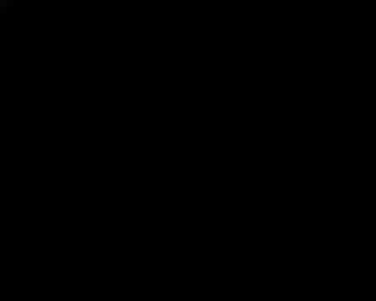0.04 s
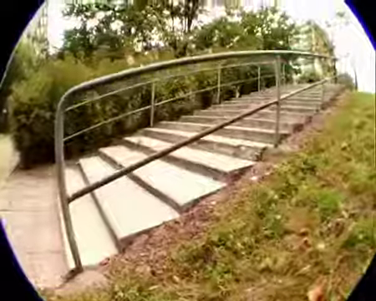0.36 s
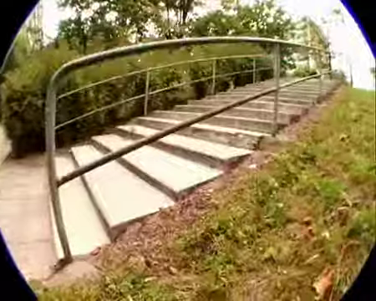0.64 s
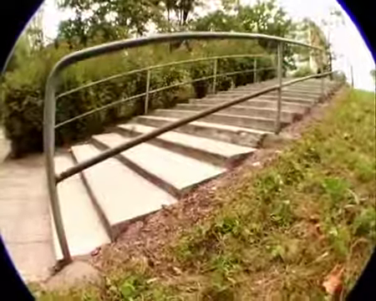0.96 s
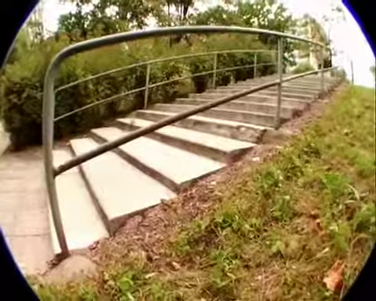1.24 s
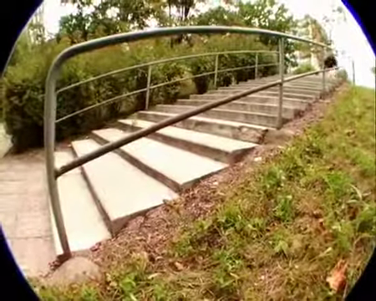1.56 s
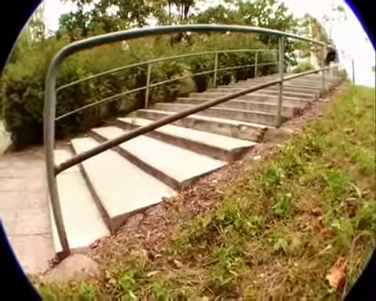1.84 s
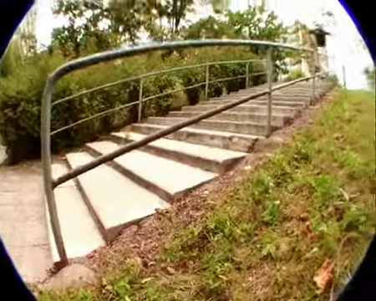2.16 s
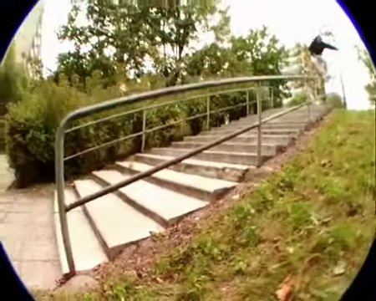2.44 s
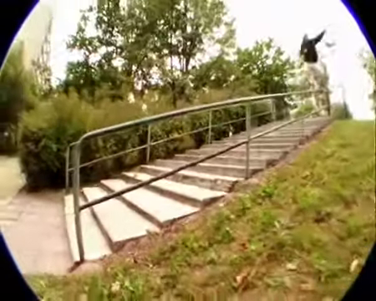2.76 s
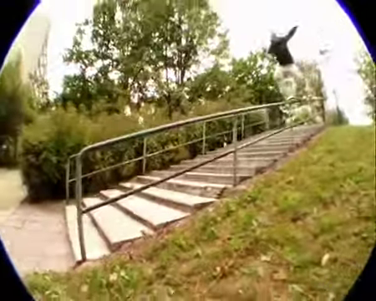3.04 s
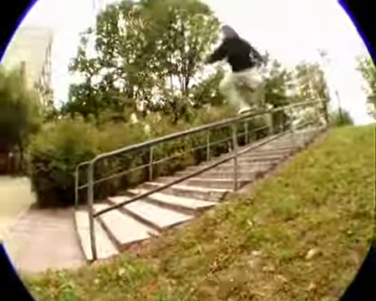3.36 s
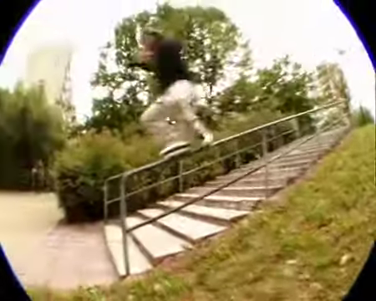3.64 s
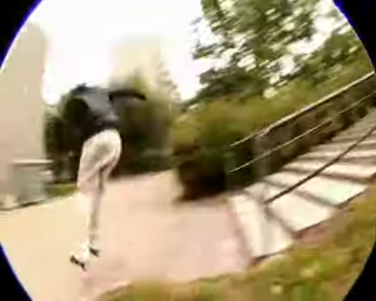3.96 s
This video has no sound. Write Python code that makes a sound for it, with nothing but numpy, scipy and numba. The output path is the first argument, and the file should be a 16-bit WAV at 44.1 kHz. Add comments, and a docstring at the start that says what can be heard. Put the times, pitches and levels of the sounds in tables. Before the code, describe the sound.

Skateboard grinding down a steel rail outdoors, after a rumbling run-up and a sharp ringing impact.

```python
"""A quiet park, at the foot of a stairway with a long steel handrail, where a camcorder whines faintly.
A skateboard rasps in the distance, rumbles and thumps up to the steps and lands on the rail with a clank.
It grinds down towards us, louder as it nears: the truck sticks and slips on the tube, scraping, hissing,
squealing and snagging. Steps and buildings echo, and the tube rings on after the board leaves it."""
import sys
import numpy as np
from scipy import signal
from scipy.fft import rfft, irfft
from scipy.io import wavfile
from numba import njit

SR = 44100
rng = np.random.default_rng(int(sys.argv[2]) if len(sys.argv) > 2 else 0)


def generate_wav(sig):
    """Save sig (samples, or channels by samples) to the path in sys.argv[1] as 16-bit PCM at SR."""
    pcm = np.round(np.clip(np.atleast_2d(sig).T, -1, 1) * 32767).astype(np.int16)
    wavfile.write(sys.argv[1], SR, pcm)


N = 176400
GRIND_S, LEAVE_S = 2.56, 3.822  # the truck starts to slide; it leaves the rail

# park bed of air and distant traffic: f/Hz, level/dB
PARK_EQ = [(15, -50), (25, 2.5), (140, -3.5), (173, -2), (297, -11), (349, -8.5), (598, -21.5),
           (648, -17.5), (1170, -25), (1450, -27), (1650, -23.5), (1900, -29.5), (3440, -33.5), (4040, -42),
           (5730, -34.5), (13900, -46.5), (15500, -54)]
# air that reaches each microphone port separately: f/Hz, level/dB
DIFFUSE_EQ = [(200, -19), (700, -2), (2400, 7.5), (6000, 4)]
# small dry ticks close by: t/s, level/dB, f/Hz, t60/s
DRY_TICKS = [(0.278, -45, 600, 0.036), (0.316, -55, 1100, .02), (0.679, -52, 1480, 0.018),
             (0.9496, -47, 3330, 0.0092), (0.9515, -44.5, 5600, 0.0067), (0.9517, -52, 9300, .006),
             (0.993, -57, 9400, .006), (1.379, -49.5, 9500, .006)]
# far wheels on paving: f/Hz, level/dB
RASP_EQ = [(300, -15), (600, 3.5), (1100, -3.5), (1650, -3.5), (2200, -10), (3200, -8), (4100, -23),
           (6000, -15), (12000, -34)]
# fader ride of the board's rumble: t/s, level/dB
RUMBLE_RIDE = [(1.25, -80), (1.47, -47.5), (1.6, -41), (1.7, -43.5), (1.95, -41), (2.0, -45.5), (2.14, -46),
               (2.2, -54.5), (2.33, -57.5), (2.48, -46.5), (2.58, -37.5), (2.7, -45), (2.93, -50),
               (3.03, -44), (3.09, -50), (3.5, -51), (3.8, -61), (4.0, -52)]
# tone of that rumble: f/Hz, level/dB
RUMBLE_EQ = [(30, -6.5), (60, 0), (95, 2.5), (140, -11.5), (200, 3), (330, -9.5), (500, -14), (900, -24),
             (2000, -36), (6000, -42.5), (12000, -54.5)]
# bumps of the run-up: t/s, level/dB, f/Hz, t60/s
WHEEL_THUMPS = [(1.5083, -24, 310, .028), (1.5195, -38, 700, .02), (1.561, -30, 280, .028),
                (1.609, -35, 260, .025), (1.630, -23.5, 150, .035), (1.6398, -23, 115, .045),
                (1.642, -29, 520, .025), (1.692, -33, 190, .03), (1.7045, -28, 92, .055),
                (1.718, -31, 300, .015), (1.846, -31, 170, .06), (1.889, -31, 185, .05),
                (1.917, -32, 330, .025), (1.958, -29, 150, .045), (2.007, -39, 600, .015),
                (2.036, -32, 115, .06), (2.056, -30, 230, .04), (2.122, -32, 345, .045),
                (2.147, -34, 130, .035)]
# scuff on each thump: f/Hz, level/dB
SCUFF_EQ = [(300, 5), (1200, -9), (2000, -20), (3200, -14), (4100, -32), (6000, -25), (12000, -46)]
# blows of the landing: t/s, level/dB, treble/dB
LANDING_BLOWS = [(2.5, -21.5, 5), (2.508, -6.5, -7.5), (2.5136, -2, -4), (2.516, -4.5, 7.5),
                 (2.5258, -4, 6.5), (2.533, -21, 4), (2.547, -10.5, -20), (2.575, -33, -22)]
# clack of deck and truck: f/Hz, level/dB
CLACK_EQ = [(50, -7), (85, -5), (130, -10), (235, 2.5), (340, -3), (800, -1), (1600, -6), (2500, -7),
            (3300, -16), (4100, -23), (5900, -12), (9000, -22), (13000, -29), (15500, -36)]
# strong modes of the rail: f/Hz, level struck near the top/dB, level rubbed lower down/dB, t60/s
RAIL_MODES = [(177, -6, -12, .6), (251, -.5, -13, .35), (353, -10, -6, .7), (399, -5, -14, .55),
              (468, -5.5, -12, .45), (493, -6, -2, .7), (560, -14, -1, .7), (653, 3, -14, .33),
              (718, -7, -13, .35), (802, 3, -7, .35), (824, -9, -6, .5), (860, -7, -4, .55),
              (940, -8, -3.5, .55), (987, -8, -4, .5), (1016, -2, -4, .45), (1054, -2, -1, .4),
              (1249, -14, -1, .6), (1324, -7, -4, .52), (1405, -8, -3, .52), (1455, -7, -2, .55),
              (1591, -3, -4, .44), (1654, -6, -4, .4), (1701, -7, -6, .45), (1766, -10, -12, .85),
              (1927, -13, -5, .68), (2234, -16, -6, .3), (2560, -16, -7, .35), (2745, -23, -10.5, .75),
              (3110, -26, -11, .7), (3210, -21, -6, .65), (3355, -24, -13, .4), (4684, -19, -12, .28),
              (5010, -18, -10.5, .3), (5180, -21, -12, .35), (5790, -16, -14, .2), (5956, -8, -12, .15),
              (6288, -14, -16, .2)]
# contour of the tube's many weaker modes: f/Hz, level/dB
WEAK_MODE_EQ = [(330, -16), (520, -7), (900, 0.5), (1700, -4), (2700, -14), (3400, -5), (4050, -30),
                (5050, -7.5), (6400, -8), (8000, -22), (14000, -44)]
# air and hedges dull the landing's echo: f/Hz, level/dB
ECHO_EQ = [(6500, 0), (9000, -4), (13000, -12)]
# how hard the truck bears on the tube: t/s, level/dB
TRUCK_PRESSURE = [(2.6, -7.5), (2.75, -6), (2.9, -5), (3.03, -2), (3.19, -4.5), (3.34, 0), (3.46, -3),
                  (3.56, -0.5), (3.64, -0.5), (3.77, 2), (3.82, 1.5)]
# body of the scrape: f/Hz, level/dB
SCRAPE_EQ = [(150, -17), (380, -11), (550, -1.5), (700, -3.5), (950, -1.5), (1500, -1), (2100, -5),
             (3300, -13.5), (4100, -20.5), (6000, -37), (14000, -38)]
# hiss on top of it: f/Hz, level/dB
HISS_EQ = [(1200, -8), (2500, 6), (3500, -1), (4150, -11), (5100, -2.5), (6300, -6), (7800, -5.5),
           (10300, -11), (12000, -18.5), (15500, -26)]
# resonances of the truck pressed on the tube: f/Hz, half-width per filter pass/Hz, level/dB
TRUCK_BANDS = [(823, 85, 2), (1367, 130, -1), (2070, 150, -8.5)]
# their pitch sags, then rises near the bottom: t/s, frequency ratio
TRUCK_BEND = [(3.0, 1.02), (3.45, .96), (3.58, 1.04), (3.68, 1.17), (3.82, 1.14)]
# narrow squeal of metal on metal: f/Hz, half-width per filter pass/Hz, level/dB
SQUEAL_BANDS = [(4650, 53, -6), (4980, 81, -0.5), (5370, 70, -3), (5800, 71, -0.5), (6500, 70, -1.5),
                (7270, 130, -11)]
# hard snags of the truck: t/s, level/dB
SNAG_HITS = [(3.128, 2), (3.332, -6), (3.363, -3), (3.430, -2), (3.473, -3), (3.530, 4), (3.574, -1),
             (3.601, -5), (3.640, -5), (3.679, -2), (3.759, -2), (3.7925, 3), (3.8138, 3)]
# a snag is a shade duller than the steady scrape: f/Hz, level/dB
SNAG_EQ = [(2500, 0), (7000, -1)]
# stereo width at the microphone ports, side against mid: f/Hz, level/dB
SIDE_EQ = [(60, -13), (200, -12), (700, -29.5), (1300, -14), (2400, -31), (4400, -1.5), (8000, -6.5),
           (15000, 3.5)]
# the housing colours the ports differently: f/Hz, left minus right/dB, left phase lead/rad
PORT_COLOUR = [(100, 0.5, -0.12), (710, -0.5, -0.23), (3760, 1, -0.4), (3990, -7, -2.5), (4990, 8.5, 0.5),
               (5000, -2, 0), (7750, 2.5, -2.5), (9900, 0.5, -1.5), (13100, -1, -1)]


def undb(db):
    """Decibels to gain."""
    return 10 ** (np.asarray(db) / 20)


def unit(x):
    """Scale to rms 1."""
    return x / np.sqrt(np.mean(x ** 2))


def energy(x):
    """Scale to an average energy of 1 a channel."""
    return x / np.sqrt(np.sum(x ** 2) / len(x))


def gain_at(hz, eq):
    """Gain of an EQ curve at given frequencies."""
    f, db = np.array(eq).T
    return undb(np.interp(np.log(np.maximum(hz, 1)), np.log(f), db))


def convolve(x, response):
    """Play a signal through an impulse response."""
    return signal.fftconvolve(np.atleast_2d(x), np.atleast_2d(response), axes=1)[:, :N]


def colour(x, eq):
    """Minimum-phase EQ: nothing rings ahead of an attack."""
    cepstrum = irfft(np.log(gain_at(np.arange(2049) * SR / 4096, eq)))
    cepstrum[1:2048] *= 2
    response = irfft(np.exp(rfft(cepstrum[:2048], 4096)))
    return convolve(x, response[:2048])


def stereo(mid, side):
    """Left and right: narrow in the bass, wide in the treble."""
    return mid + colour(side, SIDE_EQ) * np.array([[1], [-1]])


def noise():
    """Broadband stereo noise."""
    return stereo(*rng.standard_normal((2, N)))


def decay(at, t60):
    """Exponential decay from a moment on."""
    age = np.arange(N) / SR - at
    return (age >= 0) * np.exp(-np.log(1000) * np.maximum(age, 0) / t60)


def drift(rate_hz):
    """Smooth random drift with a spread near 1."""
    return np.interp(np.arange(N) / SR * rate_hz, np.arange(2048), rng.standard_normal(2048))


def park_air(level_db=-50, diffuse_db=-8.5):
    """Low, gently wavering murmur of air and distant traffic."""
    air = noise() + undb(diffuse_db) * colour(rng.standard_normal((2, N)), DIFFUSE_EQ)
    return undb(level_db + drift(6.32)) * unit(colour(air, PARK_EQ))


def camcorder_whine(hz=15625, level_db=-71):
    """The camcorder's thin, steady tone."""
    t = np.arange(N) / SR
    return undb(level_db) * np.sin(2 * np.pi * hz * t)


def ticks():
    """Small dry ticks: short bursts of band-passed noise."""
    out = 0
    for at, db, hz, t60 in DRY_TICKS:
        band = signal.butter(2, [hz * .85, hz * 1.15], "band", fs=SR, output="sos")
        out = out + undb(db) * unit(signal.sosfilt(band, noise())) * decay(at, t60)
    return out


def stick_slip(catches_per_s=4000, spread_db=2.5):
    """Friction as a dense train of tiny catches of uneven size."""
    caught = rng.random(N) < catches_per_s / SR
    sign = np.sign(rng.standard_normal(N))
    size = undb(spread_db * np.minimum(rng.exponential(size=N), 5))
    return unit(caught * sign * size)


def far_wheels(level_db=-61, peak_s=1, half_length_s=.31):
    """Far-off wheels rasp on the paving in one faint, gritty swell."""
    swell = np.exp(-((np.arange(N) / SR - peak_s) / half_length_s) ** 2)
    return undb(level_db) * swell * unit(colour(stereo(stick_slip(), stick_slip()), RASP_EQ))


def board_rumble(flutter_db=2.2):
    """Dull, uneven rumble of the moving board."""
    ride_db = np.interp(np.arange(N) / SR, *np.array(RUMBLE_RIDE).T, left=-100)
    level = undb(ride_db + flutter_db * drift(45))
    return level * unit(colour(noise(), RUMBLE_EQ))


def wheel_thumps(scuff_db=-17.5):
    """Each bump of the run-up knocks out a damped tone and a scuff of grit."""
    t = np.arange(N) / SR
    grit = unit(colour(noise(), SCUFF_EQ))
    out = 0
    for at, db, hz, t60 in WHEEL_THUMPS:
        attack = 1 - decay(at, t60=.002)  # the wheel gives a little as it meets the bump
        body = decay(at, t60) * np.sin(2 * np.pi * hz * (t - at))
        scuff = undb(scuff_db) * decay(at, t60=.063) * grit
        out = out + undb(db) * attack * (body + scuff)
    return out


def landing_clack(level_db=18, echo_db=-5):
    """Wheels, truck and deck slam down in quick succession, with a dulled echo behind them."""
    blows = 0
    for at, db, treble_db in LANDING_BLOWS:
        burst = energy(noise() * decay(at, t60=.062))
        blows = blows + undb(db) * colour(burst, [(1300, 0), (5000, treble_db)])
    clack = undb(level_db) * colour(blows, CLACK_EQ)
    return clack + undb(echo_db) * colour(convolve(clack, stairway_echo()), ECHO_EQ)


def modes(hz, gain, t60):
    """Decaying sines, each with its own phase and pan."""
    t = np.arange(SR) / SR
    pan = rng.choice([-1, 1], len(hz)) * gain_at(hz, SIDE_EQ)
    phase = rng.uniform(0, 2 * np.pi, (len(hz), 1))
    tails = np.exp(-np.log(1000) * np.outer(1 / t60, t))
    waves = np.sin(2 * np.pi * np.outer(hz, t) + phase) * tails
    return energy((gain * np.array([1 + pan, 1 - pan])) @ waves)


def handrail(weak_count=260, damping=.81):
    """Responses of the steel tube: strong modes struck, strong modes rubbed, and a wash of weak ones."""
    hz, struck_db, rubbed_db, t60 = np.array(RAIL_MODES).T
    grid = np.linspace(np.sqrt(330), np.sqrt(9000), weak_count)
    weak_hz = (grid + (grid[1] - grid[0]) * rng.uniform(-.508, .547, weak_count)) ** 2
    weak_gain = gain_at(weak_hz, WEAK_MODE_EQ) * rng.uniform(-1.81, 1, weak_count)
    wash = modes(weak_hz, weak_gain, t60=(weak_hz / 1000) ** -damping)
    return modes(hz, undb(struck_db), t60), modes(hz, undb(rubbed_db), t60), wash


def rail_clank(struck, wash, at_s=2.514, rise_s=.006, struck_db=11, wash_db=1.5):
    """The heaviest blow sets the rail ringing; the ring blooms as waves run along the tube."""
    force = np.zeros(N)
    force[int(at_s * SR)] = 1
    bloom = 1 - np.exp(-np.arange(SR) / SR / rise_s)
    return convolve(force, bloom * (undb(struck_db) * struck + undb(wash_db) * wash))


def stairway_echo(predelay_s=.019, mid_t60_s=.57, damping=.2):
    """Diffuse response of steps and buildings; the treble dies first."""
    f = np.arange(N // 2 + 1) * SR / N
    spectrum, tail = rfft(noise()), 0
    edges_hz = [0, 350, 700, 1400, 2800, 5600, 11200, SR]
    for k, (low, high) in enumerate(zip(edges_hz, edges_hz[1:])):
        band = irfft(spectrum * (f >= low) * (f < high), N)
        tail = tail + band * decay(predelay_s, mid_t60_s * 2 ** (-damping * (k - 2)))
    return energy(tail[:, :SR])


def grind(rubbed, wash, far_m=9.5, near_m=2.1, grip_s=.05, release_s=.006, judder_db=2.1, echo_db=-11):
    """The truck judders down the tube and keeps it ringing, grows louder as it nears, then lets go."""
    t = np.arange(N) / SR
    distance = np.interp(t, [GRIND_S, LEAVE_S], [far_m, near_m])
    grip = np.clip((t - GRIND_S) / grip_s, 0, 1)
    release = np.exp(-np.maximum(t - LEAVE_S, 0) / release_s)
    contact = grip * release * undb(np.interp(t, *np.array(TRUCK_PRESSURE).T))
    judder = undb(judder_db * drift(44.9))
    snags = colour(truck_snags() / distance, SNAG_EQ)[0]
    rub, rub_side = (stick_slip() * contact * judder / distance for _ in range(2))
    scrape = undb(-19.5) * colour(stereo(rub + snags, rub_side), SCRAPE_EQ)
    hiss = undb(-35) * unit(colour(stereo(stick_slip(), stick_slip()), HISS_EQ)) / distance ** 1.114
    bend = np.interp(t, *np.array(TRUCK_BEND).T)
    truck = undb(-38.5) * singing_metal(TRUCK_BANDS, waver=.035, bend=bend) / distance ** .45
    squeal_mid, squeal_side = (singing_metal(SQUEAL_BANDS, waver=.008) for _ in range(2))
    squeal = undb(-43.5) * stereo(squeal_mid, squeal_side) / distance
    direct = scrape + (hiss + truck + squeal) * contact * np.sqrt(judder)
    ring = convolve(rub + .35 * snags, undb(-34) * rubbed + undb(-31.5) * wash)
    return direct + ring + undb(echo_db) * convolve(direct, stairway_echo())


@njit
def resonate(x, hz, width_hz):
    """Band-pass whose centre may move every sample."""
    y, band_state, low_state = np.empty(len(x)), 0., 0.
    for i in range(len(x)):
        tuning, damping = np.tan(np.pi * hz[i] / SR), width_hz / hz[i]
        band = (band_state + tuning * (x[i] - low_state)) / (1 + tuning * (tuning + damping))
        band_state = 2 * band - band_state
        low_state += 2 * tuning * band
        y[i] = damping * band
    return y


def singing_metal(bands, waver, bend=1, waver_hz=18, swell_db=3):
    """Stick and slip drives resonances that waver in pitch and swell as the contact shifts."""
    out = 0
    for hz, half_width_hz, db in bands:
        centre_hz = hz * bend * (1 + waver * drift(waver_hz))
        tone = stick_slip()
        for _ in range(2):
            tone = resonate(tone, centre_hz, 2. * half_width_hz)
        out = out + unit(tone) * undb(db + swell_db * drift(waver_hz))
    return unit(out)


def truck_snags(force_db=32):
    """The truck catches hard on the tube: short jolts of noisy force."""
    force = 0
    for at, db in SNAG_HITS:
        jolt = energy(rng.standard_normal((1, N)) * decay(at, t60=.028))[0]
        force = force + undb(force_db + db) * jolt
    return force


def scene():
    """Park bed, run-up, landing and grind, with one rail for both clank and slide."""
    struck, rubbed, wash = handrail()
    bed = park_air() + camcorder_whine() + ticks()
    rolling = board_rumble() + wheel_thumps()
    landing = landing_clack() + rail_clank(struck, wash)
    return bed + rolling + landing + grind(rubbed, wash) + far_wheels()


def record(dry, cut_in_s=.279, ceiling=.4, top_hz=15800):
    """The camcorder cuts in; its housing colours each port, peaks are rounded and the top is cut."""
    hz, balance_db, lead_rad = np.array(PORT_COLOUR).T
    f = np.arange(N // 2 + 1) * SR / N
    left = undb(np.interp(f, hz, balance_db) / 2) * np.exp(1j * np.interp(f, hz, lead_rad) / 2)
    heard = irfft(rfft(dry) * np.array([left, 1 / left]), N)
    heard *= np.arange(N) / SR >= cut_in_s
    rounded = ceiling * np.tanh(heard / ceiling)
    return signal.sosfilt(signal.ellip(12, .2, 70, top_hz, fs=SR, output="sos"), rounded)


dry = scene()
out = record(dry)
generate_wav(out)
```